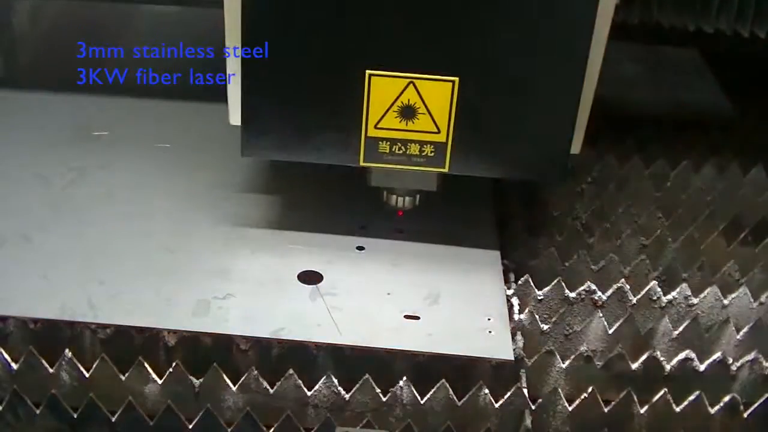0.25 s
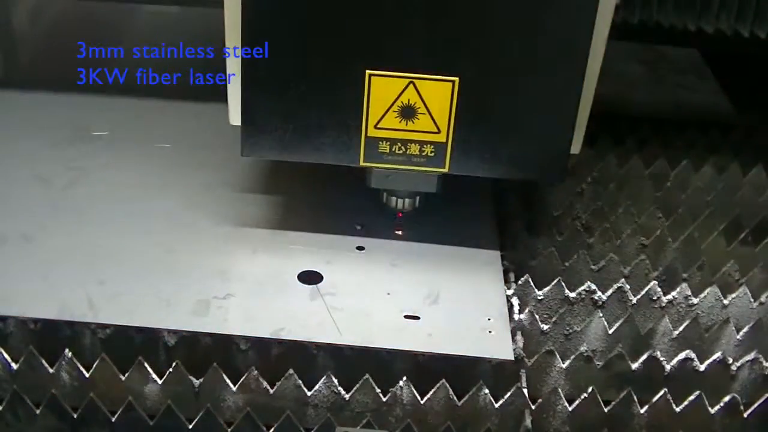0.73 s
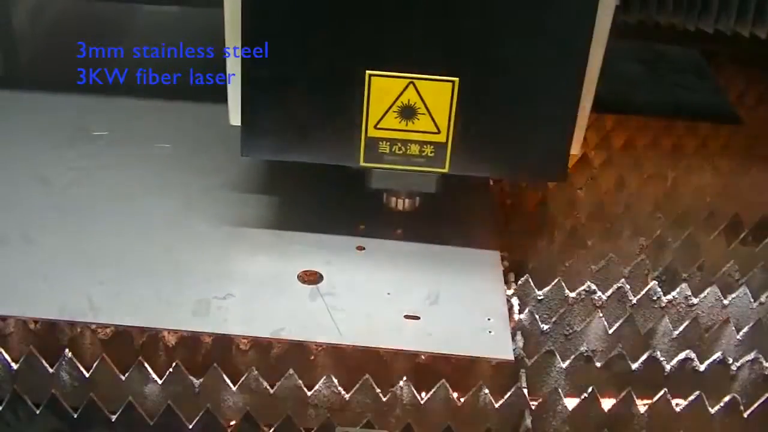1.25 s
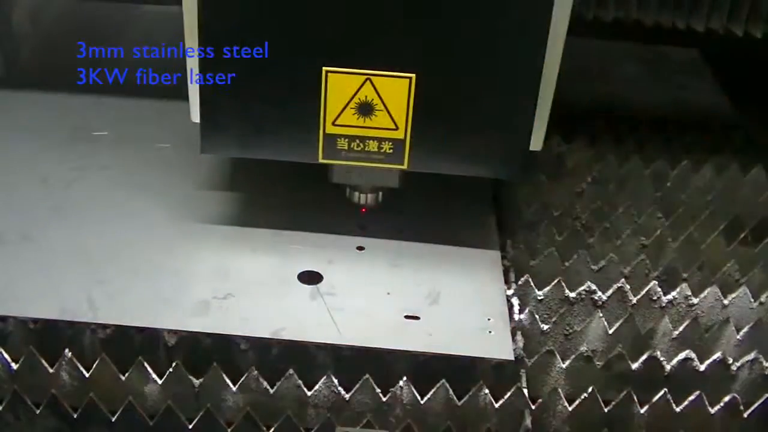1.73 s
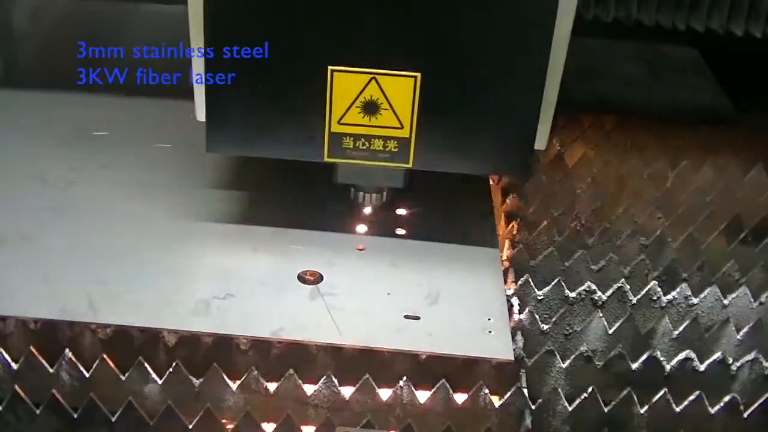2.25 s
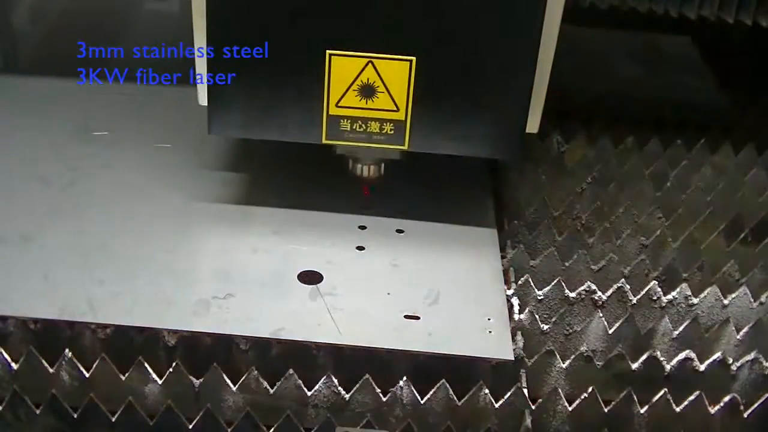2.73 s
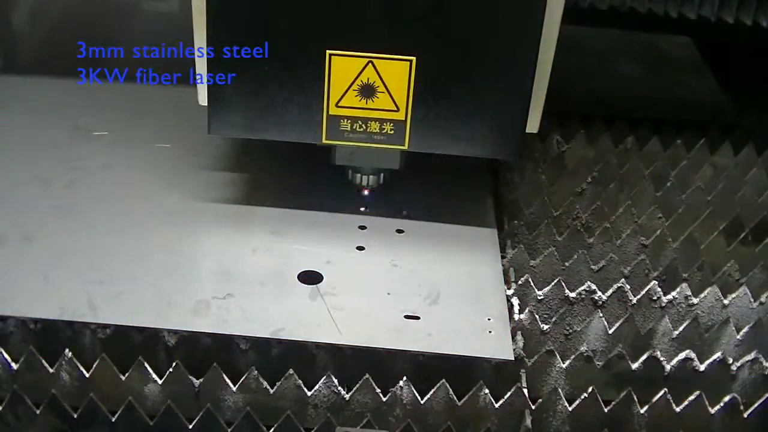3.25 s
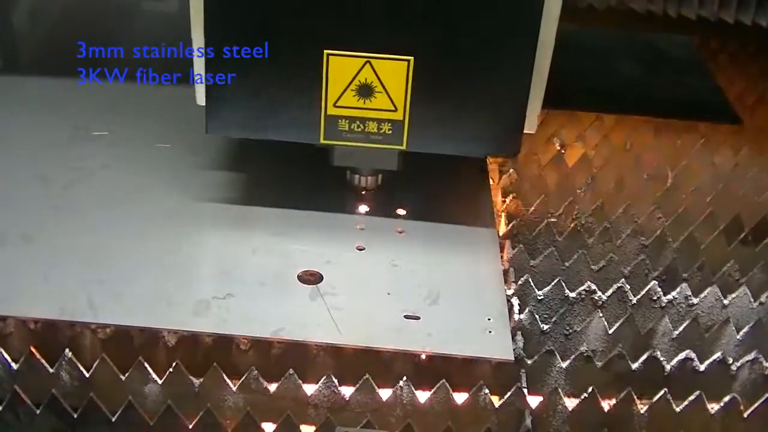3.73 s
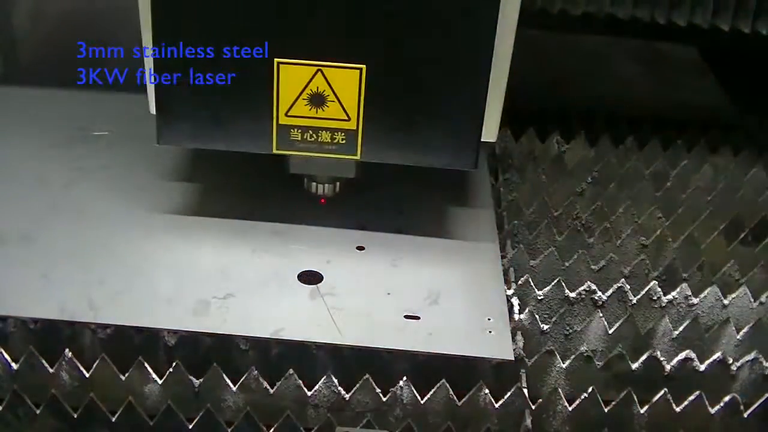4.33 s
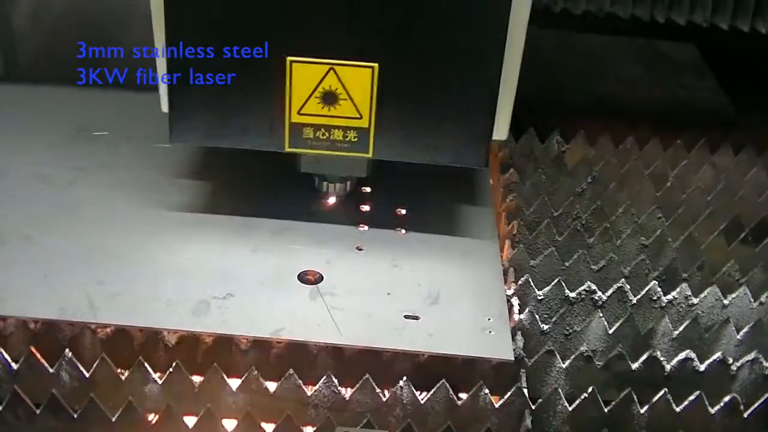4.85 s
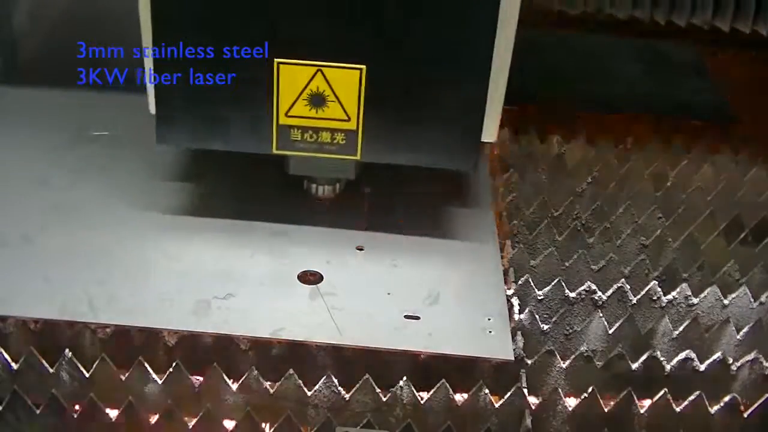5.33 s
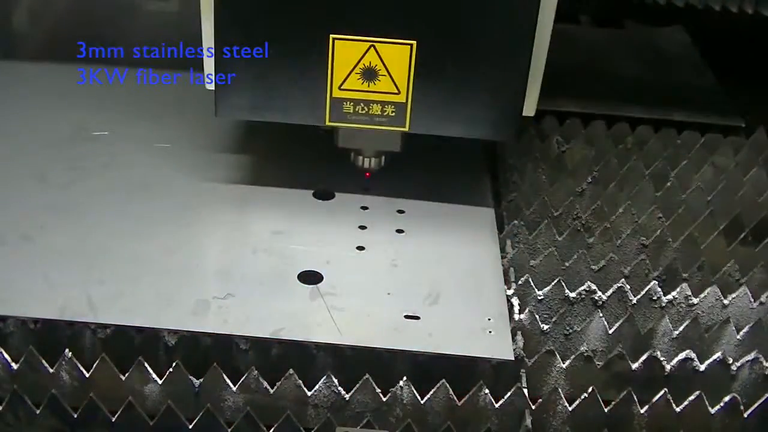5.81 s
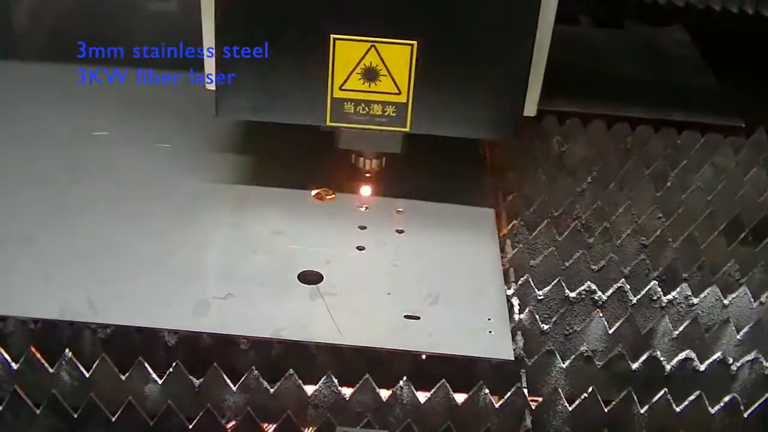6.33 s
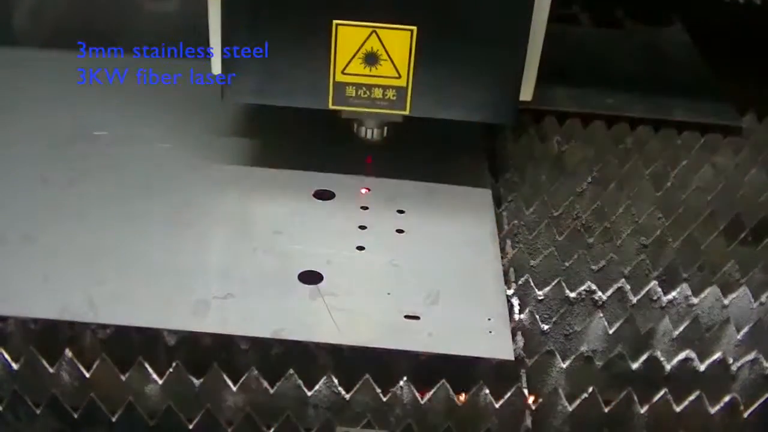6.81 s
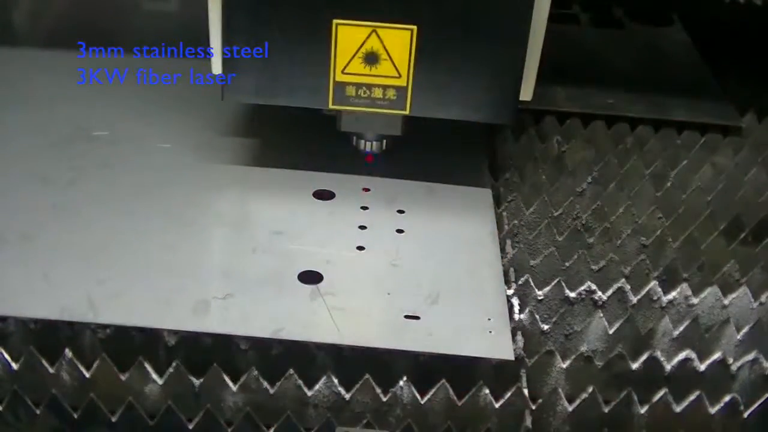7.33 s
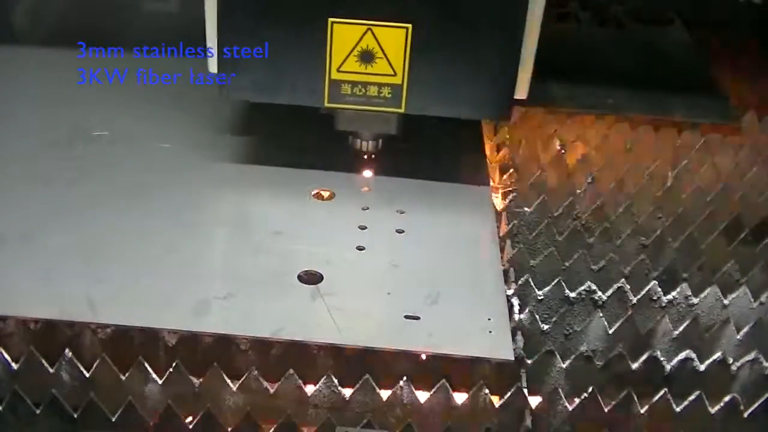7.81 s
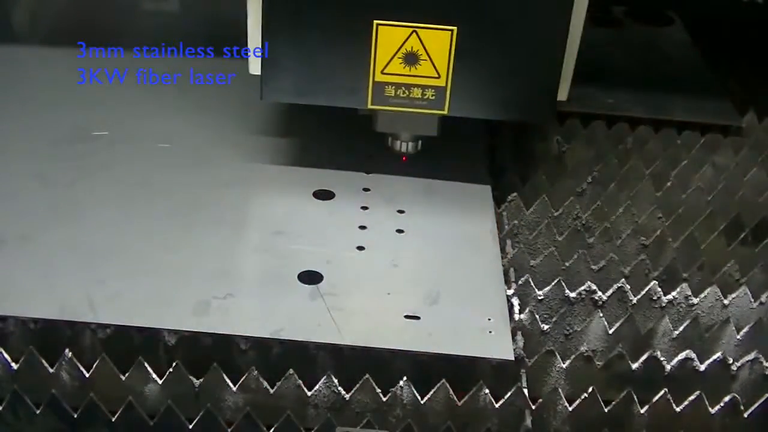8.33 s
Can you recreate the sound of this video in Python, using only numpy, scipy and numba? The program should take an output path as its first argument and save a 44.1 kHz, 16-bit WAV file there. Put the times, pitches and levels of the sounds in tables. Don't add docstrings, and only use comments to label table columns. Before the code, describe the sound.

Close in a workshop, a laser cutting head blasts gas at sheet steel in repeated bursts a little over a second apart. Each opens with a metallic knock and strong hiss, cracks through with a thud and quick upward whistle, then swells and drops away briefly. Low booming churns beneath, molten drops snap, and extraction fans drone.

```python
import sys
import numpy as np
from scipy import signal
from scipy.fft import rfft, irfft, next_fast_len
from scipy.io import wavfile
from scipy.ndimage import uniform_filter1d
from numba import njit

SR = 44100
rng = np.random.default_rng(int(sys.argv[2]) if len(sys.argv) > 2 else 0)


def dump(signal):
    limited = np.clip(np.atleast_2d(signal).T, -1, 1)
    pcm = np.round(limited * 32767).astype(np.int16)
    wavfile.write(sys.argv[1], SR, pcm)


N = 377937
SIZE = next_fast_len(N)
HZ = np.fft.rfftfreq(SIZE, 1 / SR)[1:]

# [valve shuts t/s, hiss level/dB, gap roar level/dB, sheet roar level/dB, lift swell/dB]
BLASTS = [
    (.105, -17, -29.5, -35.5, 4.5),
    (1.405, -17.5, -27, -31.5, 4),
    (2.695, -16.5, -26, -32.5, 5.5),
    (3.98, -18, -26, -30, -1),
    (5.515, -18.5, -26, -29, 4.5),
    (6.83, -18.5, -28, -31, 4),
    (8.11, -18, -28.5, -33.5, -3),
    (9.4, -18.5, -28.5, -30.5, .1),
]
# [t/s, peak level/dB, low level/dB]
VALVE_KNOCKS = [
    (0.231, -21, -60),
    (1.511, -11, -48),
    (2.798, -14, -47),
    (4.097, -7.5, -57),
    (5.648, -11, -51),
    (6.934, -14, -52),
    (8.226, -12, -49),
]
LEAK_LEAD_S = [0, .013, .023, .011, .011, .022, .011, .010]
# [t/s, half length/s, hiss
# loss/dB, sizzle loss/dB, sheet gain/dB]
CHOKES = [(0.927, .06, 5.5, 2, 1), (2.197, 0.096, 3.5, 1.5, 5), (3.503, 0.053, 5.5, 2.5, -1),
          (4.586, 0.11, 5, -2.3, 2.5), (4.862, 0.077, .3, 2.5, -2), (5.1, 0.19, 3, -3, .6),
          (5.32, 0.17, -1.5, -1, 1), (2.078, .04, -2.2, 0.5, 1.5), (5.934, 0.051, -1, -0.5, 3.5),
          (6.326, 0.041, 6.5, 1, -1), (6.66, 0.077, -0.5, -1, 2), (7.412, 0.089, 2.2, -0.5, -3.5),
          (7.613, 0.054, 7.5, 0, -0.5), (8.152, 0.037, -15, -5, 3)]
# [t/s, sheet loss/dB, gap loss/dB, hiss loss/dB]
VENTS = [
    (1.2, -1, -2, 0),
    (2.46, 1, 4, 1.7),
    (3.78, 4.5, 9, 7),
    (5.28, 7, 4, .3),
    (6.6, 10.5, 2.5, 0),
    (7.92, 5.5, 9, 8.5),
]
CROSSOVERS_HZ = [1800, 3200, 7500]
# [f/Hz, level/dB per Hz]
JET = [(88, -62), (150, -31.5), (610, -21), (756, -15), (850, -16), (993, -16.5), (1470, -11),
       (1590, -10.5), (2000, -19), (2630, -17), (3390, -11), (5100, -8), (9520, -17.5), (10700, -16),
       (15800, -29)]
# [f/Hz, width/Hz, gain/dB]
HOLLOWS = [(285, 22, 6), (385, 70, 3), (555, 30, 3), (650, 25, 5), (765, 50, 5), (1011, 43, 4),
           (1340, 110, 2), (1633, 60, 4), (2270, 90, 3), (2631, 55, 7), (2929, 45, 5.5), (3850, 300, 3),
           (4735, 130, 2), (3400, 300, -3), (5100, 500, 4), (5600, 150, 2), (6900, 300, 2), (7460, 200, 2),
           (10400, 500, 2), (12000, 900, -3), (12900, 700, 3), (14800, 700, 4)]
# [t/s, level/dB, boom f/Hz]
CHURN = [(0, -45.5, 560), (.3, -40, 385), (.65, -44, 450), (1.0, -42.5, 530), (1.7, -43, 400),
         (2.35, -42, 610), (2.9, -42.5, 438), (3.4, -40.5, 630), (3.95, -40.5, 460), (4.5, -40, 587),
         (4.8, -41, 600), (5.1, -38.5, 490), (5.5, -43.5, 320), (5.75, -36, 530), (6.1, -40, 480),
         (6.5, -38, 410), (7.1, -37, 474), (7.5, -40, 342), (8.57, -41, 393)]
# [t/s, crack peak level/dB, thud level/dB, whistle level/dB]
SLUG_DROPS = [
    (1.084, -13, -41, -25),
    (2.35, -13, -43, -25),
    (3.645, -9, -40, -27),
    (5.178, -17, -28.5, -37),
    (6.491, -13, -35, -27),
    (7.773, -12, -49, -25),
]
# [t/s after the slug drops, f/Hz, level/dB]
WHISTLE = [
    (0, 1090, -13),
    (.02, 1750, 0.5),
    (.04, 1880, 2.5),
    (.1, 1880, -0.5),
    (.13, 3600, -6),
    (.19, 8000, -16),
    (.26, 14200, -20),
]
# [f/Hz, level/dB, t60/s]
TABLE_MODES = [(150, -9, .1), (310, -4, .09), (370, -5, .08)]
# [f/Hz, level/dB, t60/s]
SHEET_MODES = [(830, -5, .04), (1100, -1, .05), (1600, 0, .045)]
# [t/s, peak level/dB, f/Hz]
SPITS = [
    (0.3584, -13, 4730),
    (2.968, -18, 3910),
    (3.5934, -9, 4940),
    (4.263, -4.5, 5180),
    (5.304, -10, 4400),
    (6.491, -7, 4900),
    (8.402, -8, 4100),
]
# [f/Hz, level/dB per Hz]
SHOP = [(15, -60), (25, -17), (363, -15), (427, -27), (588, -15), (709, -16), (1120, 2.5), (1720, 2.5),
        (2070, -0.5), (2500, -2.5), (5570, 1.5), (11800, -17.5), (15000, -11)]
# [f/Hz, likeness 0-1, left minus right/dB, left lead/rad]
PORTS = [(100, .1, -.8, 0), (300, .9, -1, 0), (1400, .991, 0, 0), (2300, .99, 0, 0), (3300, .8, -2, -.15),
         (4300, .985, -.6, 0), (5800, .88, -3.8, .15), (7000, .88, -.2, 0), (9000, .42, -3.8, .5),
         (10100, .5, 3.4, -.3), (11400, .2, -3.8, -3.5), (12600, .3, -2.3, -4.4), (13700, .6, 0, -3.5),
         (14900, .35, 4, -3.4)]
LIKENESS, TILT, LEAD = [[(row[0], row[k]) for row in PORTS] for k in (1, 2, 3)]

# [level/dB], [decay/s]
SURGE_DB = [3.5, 3.7, 1, 3.1]
SURGE_S = [0.032, 0.017, 0.02, .04]
STRIKE_LOSS_DB = [1.2, 0.51, 0.51, 2.9]
CUT_SWELL_DB = [1.4, 0.76, 0.94, 0.17]
# [rate/dB per s], [lead/s]
BLEED_DB_PER_S = [4.3, 5, 71, 49]
BLEED_LEAD_S = [.13, 0.14, 0.12, .16]
SHUT_DB = [1.8, 5.2, 7.8, 3.7]
AFTER_DB_PER_S = [30, 34, 37.037, 90]
LIFT_SHARE = [0.78, 0.54, .01, .01]
VENT_LEAD_S = [0.059, .005, .001, .001]

STRIKE_AFTER_S, STRIKE_S = 0.463, 0.046
CUT_LEAD_S, CUT_S = 0.025, 0.23
LIFT_LEAD_S, LIFT_S = 0.0091, 0.044
VENT_S, SHUT_S = 0.079, 0.038
ATTACK_S, LEAK_DB = 0.011, -9
LULL_DB, LULL_AFTER_S, LULL_S = 2.5, 0.1, 0.038
WAKE_SHARE, SHEET_CHURN_SHARE = 0.47, 0.2
GAP_CHOKE_SHARE = 0.45
SIZZLE_DB, SHOP_DB = -25, -30


def gas_jet(flutter_db, patchy_db, grain_db):
    eddies = from_db(grain_db * drift(220))
    noises = [coloured(at_ports(rng.standard_normal((2, N)) * eddies), hollows()) for k in range(2)]
    noises = reflections(np.array(noises), ripple_db=1.9)
    parts = np.zeros((4, 2, N))
    edges = 900 * 2 ** np.arange(0, 4.4, 1 / 3)
    for k, (low, high) in enumerate(zip(edges, edges[1:])):
        third = signal.butter(2, [low, high], "band", fs=SR, output="sos")
        band = signal.sosfilt(third, noises[k % 2])
        part = np.searchsorted(CROSSOVERS_HZ, np.sqrt(low * high))
        parts[part] += band * from_db(patchy_db * drift(6.5))
    gains, churn_db = flow(), churn()[0]
    gains[0] *= from_db(SHEET_CHURN_SHARE * (churn_db - churn_db.mean()))
    jet = sum(gain * rms_one(part) for gain, part in zip(gains, parts))
    return from_db(flutter_db * drift(4.1)) * jet


def flow():
    t = np.arange(0, N + 40, 40) / SR

    def column(values):
        return np.array(values, float)[:, None]

    def step(start, length):
        return np.clip((t - start) / length, 0, 1)

    def bump(centre, half):
        return np.exp(-((t - centre) / half) ** 2)

    shape_db = sum(column(CUT_SWELL_DB) * bump(row[0] - CUT_LEAD_S, CUT_S) for row in SLUG_DROPS)
    for s, half, hiss_db, sizzle_db, sheet_db in CHOKES:
        loss = column([-sheet_db, GAP_CHOKE_SHARE * hiss_db, hiss_db, sizzle_db])
        shape_db = shape_db - loss * bump(s, half)
    opens = [-1] + [row[0] for row in VALVE_KNOCKS]
    no_vent = [(0, 0, 0, 0)]
    vents = no_vent + list(VENTS) + no_vent
    power = 0
    for start, leak, blast, (vent, *loss_db) in zip(opens, LEAK_LEAD_S, BLASTS, vents):
        shut, hiss_db, gap_db, sheet_db, lift_db = blast
        db = column([sheet_db, gap_db, hiss_db, SIZZLE_DB])
        db = db + column(SURGE_DB) * np.exp(-np.abs(t - start) / column(SURGE_S))
        db -= column(STRIKE_LOSS_DB) * bump(start + STRIKE_AFTER_S, STRIKE_S)
        bleed = column(BLEED_DB_PER_S) * np.maximum(t - shut + column(BLEED_LEAD_S), 0)
        escape = column([*loss_db, 0]) * step(vent - column(VENT_LEAD_S), VENT_S)
        db -= np.hypot(bleed, escape)
        db += lift_db * column(LIFT_SHARE) * bump(shut - LIFT_LEAD_S, LIFT_S)
        db -= column(SHUT_DB) * step(shut - SHUT_S / 2, SHUT_S)
        db -= column(AFTER_DB_PER_S) * np.maximum(t - shut, 0)
        leaking = from_db(LEAK_DB) * step(start - leak, ATTACK_S) ** .5
        opening = np.maximum(step(start - ATTACK_S / 2, ATTACK_S), leaking)
        power = power + (from_db(db + shape_db) * opening) ** 2
    return np.array([np.interp(np.arange(N) / SR, t, np.sqrt(p)) for p in power])


def hollows():
    shape_db = at_hz(JET, HZ)
    for hz, width_hz, gain_db in HOLLOWS:
        shape_db = shape_db + gain_db / (1 + (2 * (HZ - hz) / width_hz) ** 2)
    return from_db(shape_db)


def reflections(x, ripple_db):
    cells = signal.stft(x, nperseg=2048, noverlap=1536)[2]
    pattern = rng.standard_normal(cells.shape[-2:])
    pattern = uniform_filter1d(uniform_filter1d(pattern, size=3, axis=0), size=15, axis=1)
    combed = cells * from_db(ripple_db * rms_one(uniform_filter1d(pattern, size=9, axis=1)))
    return signal.istft(combed, nperseg=2048, noverlap=1536)[1][..., :N]


def wake(sharpness, boom_db):
    level_db, centre_hz = churn()
    low = signal.butter(3, 900, fs=SR, output="sos")
    roar = signal.sosfilt(low, coloured(at_ports(rng.standard_normal((2, N))), hollows()))
    boom = np.array([moving_peak(side, centre_hz, sharpness, SR) for side in roar])
    both = roar + from_db(boom_db) * boom
    evened = both / np.sqrt(uniform_filter1d(np.mean(both ** 2, axis=0), size=SR // 3) + 1e-20)
    swing = (rms_one(flow()[0]) + 1e-9) ** WAKE_SHARE
    return from_db(level_db - lulls() + 1.16 * drift(16)) * swing * evened


def churn():
    s, level_db, centre_hz = np.transpose(CHURN)
    return [np.interp(np.arange(N) / SR, s, c) for c in (level_db, centre_hz)]


def lulls():
    t = np.arange(N) / SR
    return sum(LULL_DB * np.exp(-((t - row[0] - LULL_AFTER_S) / LULL_S) ** 2) for row in SLUG_DROPS)


def slug_drops(sharpness):
    s, crack_db, thud_db, whistle_db = np.transpose(SLUG_DROPS)
    after, pitch_hz, fade_db = np.transpose(WHISTLE)
    out = strike(s + .004, crack_db - 8, SHEET_MODES)
    out = signal.sosfilt(signal.butter(2, 600, "high", fs=SR, output="sos"), out)
    out += strike(s + 0.0078, thud_db + 1.0, TABLE_MODES)
    t = np.arange(int(after[-1] * SR)) / SR
    hz = np.interp(t, after, pitch_hz)
    for start, level_db in zip(s, whistle_db):
        tone = moving_peak(rng.standard_normal(len(t)), hz, sharpness, SR)
        tone = moving_peak(tone, hz, sharpness, SR)
        tone /= np.sqrt(np.pi / 2 * hz / sharpness / SR)
        i = int(start * SR)
        out[i:i + len(t)] += from_db(level_db + np.interp(t, after, fade_db)) * tone
    return out


def valve():
    s, peak_db, low_db = np.transpose(VALVE_KNOCKS)
    return strike(s, peak_db - 16.0, SHEET_MODES) + strike(s, low_db + 6.0, TABLE_MODES)


def strike(times, peaks_db, modes):
    at, out = (np.asarray(times) * SR).astype(int), np.zeros(N)
    spread_db = rng.normal(0, 2.5, (len(at), len(modes)))
    for k, (hz, level_db, t60) in enumerate(modes):
        clicks = np.full(N, 1e-18)
        sign = (-1) ** k
        clicks[at] = sign * from_db(peaks_db + level_db + spread_db[:, k])
        r, w = from_db(-60 / (t60 * SR)), 2 * np.pi * hz / SR
        out += signal.lfilter([0, np.sin(w)], [1, -2 * r * np.cos(w), r * r], clicks)
    return out


@njit
def moving_peak(x, hz, sharpness, sr):
    out = np.zeros(len(x))
    for i in range(2, len(x)):
        r = np.exp(-np.pi * hz[i] / sharpness / sr)
        drive = (1 - r * r) / 2 * (x[i] - x[i - 2])
        out[i] = drive + 2 * r * np.cos(2 * np.pi * hz[i] / sr) * out[i - 1] - r * r * out[i - 2]
    return out


def spatter(cycles):
    out = np.zeros(N)
    t = np.arange(-40, 41) / SR
    for s, peak_db, hz in SPITS:
        i = int((s + 0.00081) * SR) - 40
        pulse = np.cos(2 * np.pi * hz * t) * np.exp(-(t * hz / cycles) ** 2)
        out[i:i + len(t)] += from_db(peak_db + 5.0) * pulse
    return out


def shop(swell_db):
    noise = coloured(at_ports(rng.standard_normal((2, N))), from_db(at_hz(SHOP, HZ)))
    return from_db(SHOP_DB + swell_db * drift(0.9)) * rms_one(noise)


def at_ports(white):
    alike = np.clip(at_hz(LIKENESS, HZ), 0, 1)
    mid, side = rfft(white, SIZE)[:, 1:] * [np.sqrt(1 + alike), np.sqrt(1 - alike)]
    turn = np.exp(.5j * at_hz(LEAD, HZ)) * from_db(at_hz(TILT, HZ) / 2)
    pair = np.array([(mid + side) * turn, (mid - side) / turn])
    return irfft(np.pad(pair, ((0, 0), (1, 0))), SIZE)[:, :N]


def coloured(x, gain):
    return irfft(rfft(x, SIZE) * np.concatenate([[0], gain]), SIZE)[..., :N]


def drift(rate):
    r = np.exp(-80 * np.pi * rate / SR)
    slow = signal.lfilter([1], [1, -2 * r, r * r], rng.standard_normal(N // 40 + 2002))[2000:]
    return np.interp(np.arange(N) / 40, np.arange(len(slow)), rms_one(slow))


def at_hz(points, hz):
    table = np.array(points, float)
    return np.interp(np.log(hz), np.log(np.maximum(table[:, 0], 1)), table[:, 1])


def rms_one(x):
    return x / np.sqrt(np.mean(x ** 2) + 1e-20)


def from_db(db):
    return 10 ** (np.asarray(db) / 20)


def scene():
    air = gas_jet(flutter_db=.5, patchy_db=0.08, grain_db=-0.04)
    air = air + wake(sharpness=1.27, boom_db=4) + shop(swell_db=0.8)
    blows = slug_drops(sharpness=2.8) + valve() + spatter(cycles=0.63)
    blows = signal.sosfilt(signal.butter(3, 120, "high", fs=SR, output="sos"), blows)
    return air + blows * from_db([[-.6], [.6]])


def suppress(x, contrast):
    cells = signal.stft(x, nperseg=1024, noverlap=768)[2]
    power = uniform_filter1d(np.mean(np.abs(cells) ** 2, axis=0), size=3, axis=1) + 1e-20
    around = uniform_filter1d(uniform_filter1d(power, size=25, axis=0), size=5, axis=1) + 1e-20
    return signal.istft(cells * (power / around) ** contrast, nperseg=1024, noverlap=768)[1][:, :N]


def band_limit(x):
    return signal.sosfilt(signal.butter(12, 15880, fs=SR, output="sos"), x)


def record(dry):
    limited = 1.6 * np.tanh(dry / 1.6)
    cleaned = suppress(limited, contrast=.09)
    mix = signal.sosfilt(signal.cheby2(14, 70, 16800, fs=SR, output="sos"), cleaned)
    return band_limit(mix)


dry = scene()
out = record(dry)
dump(out)
```